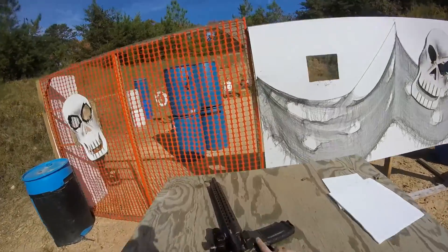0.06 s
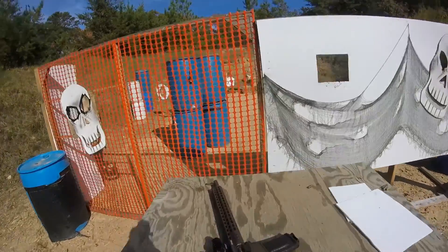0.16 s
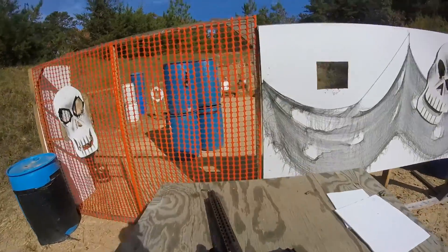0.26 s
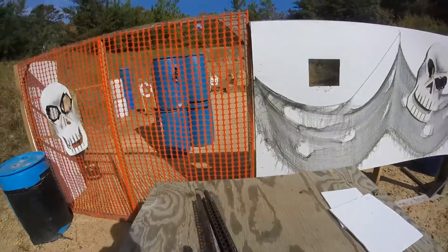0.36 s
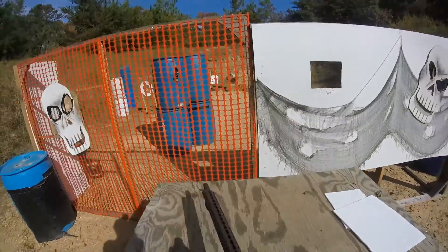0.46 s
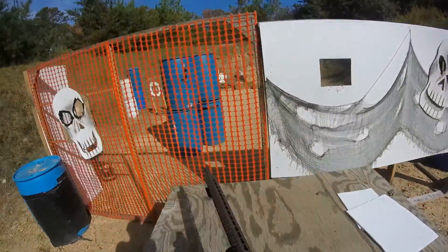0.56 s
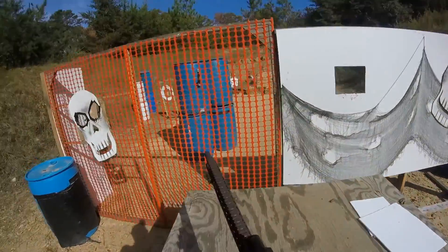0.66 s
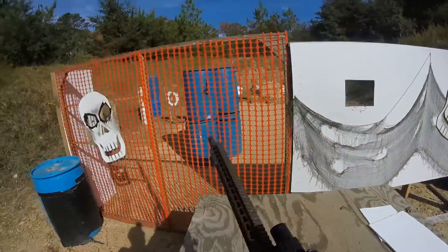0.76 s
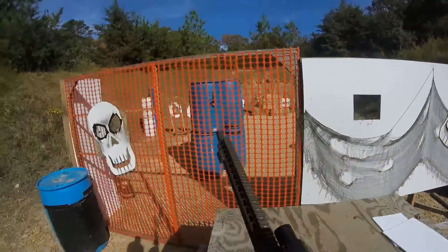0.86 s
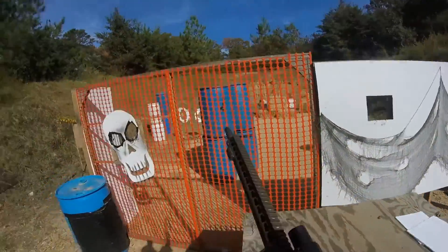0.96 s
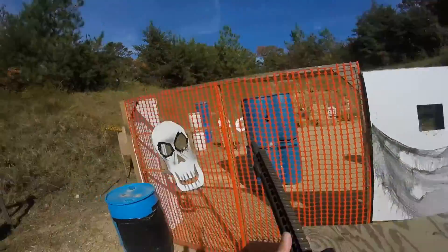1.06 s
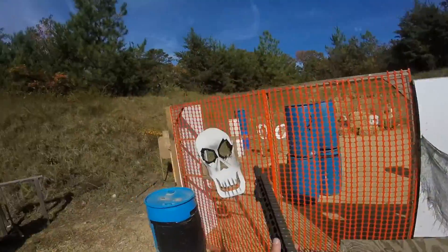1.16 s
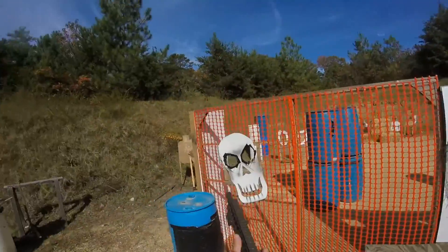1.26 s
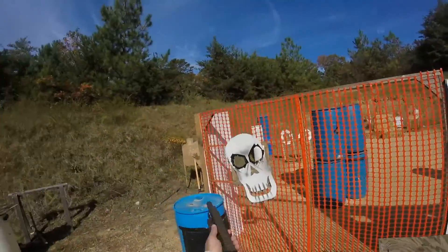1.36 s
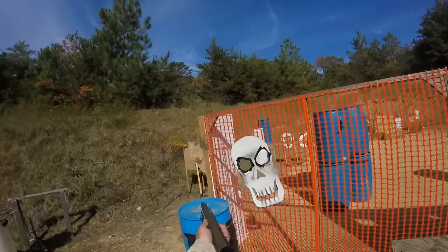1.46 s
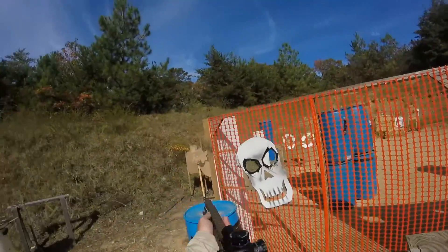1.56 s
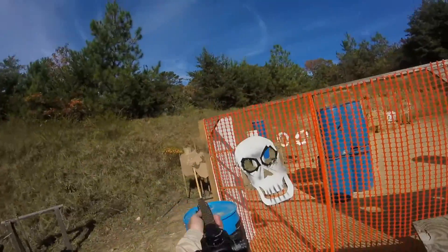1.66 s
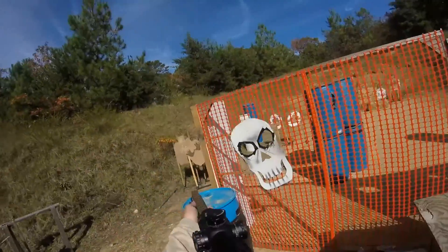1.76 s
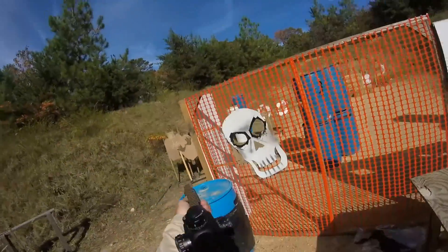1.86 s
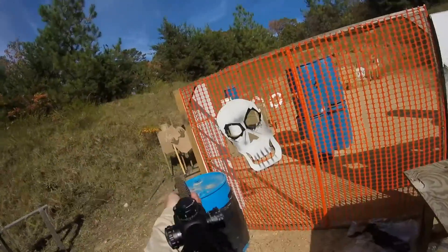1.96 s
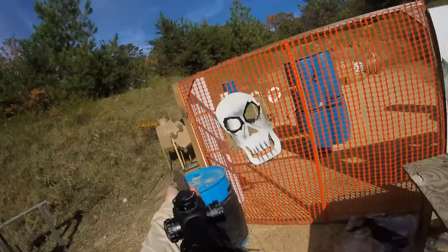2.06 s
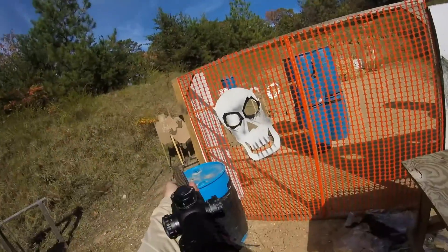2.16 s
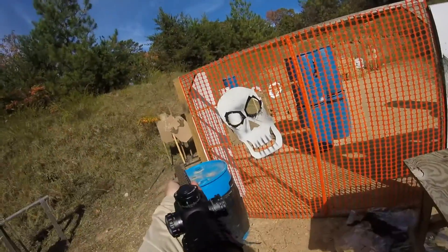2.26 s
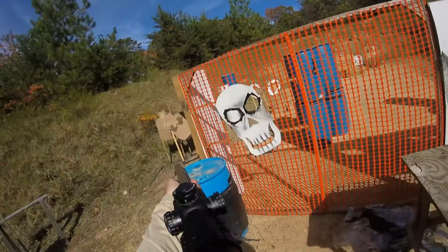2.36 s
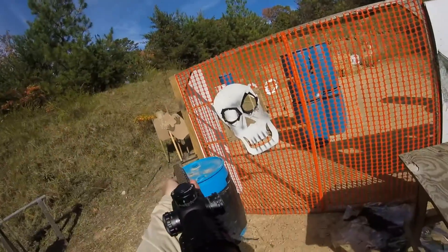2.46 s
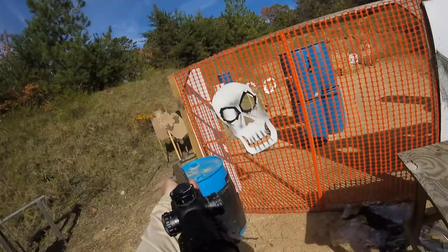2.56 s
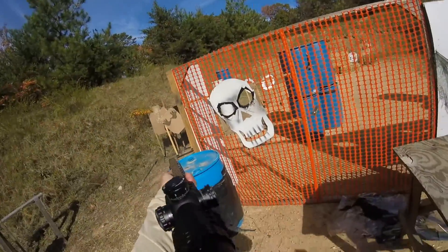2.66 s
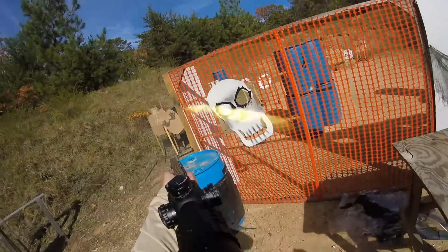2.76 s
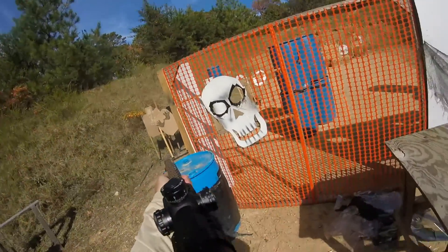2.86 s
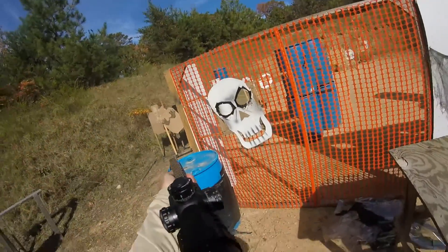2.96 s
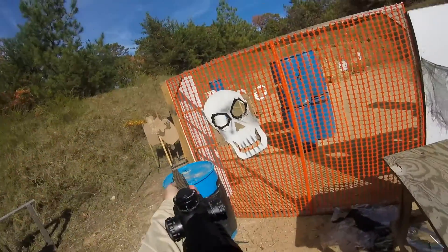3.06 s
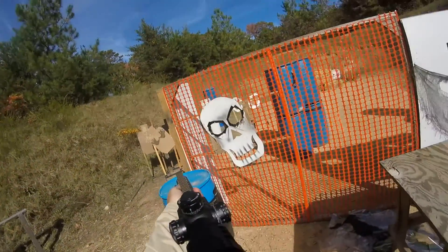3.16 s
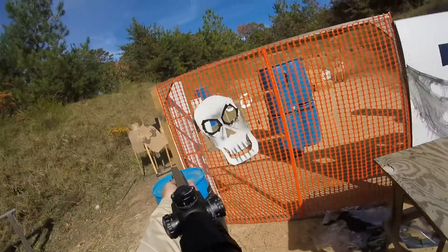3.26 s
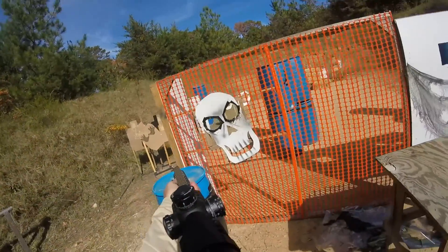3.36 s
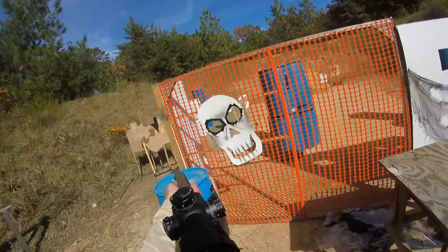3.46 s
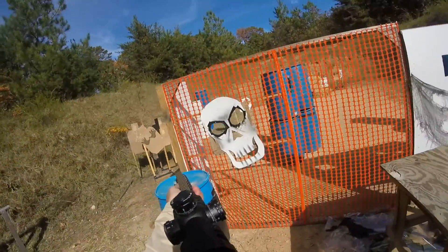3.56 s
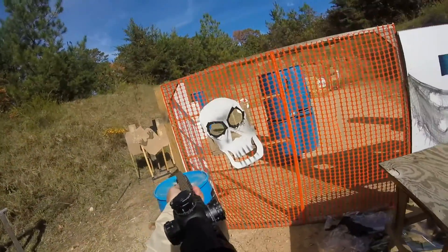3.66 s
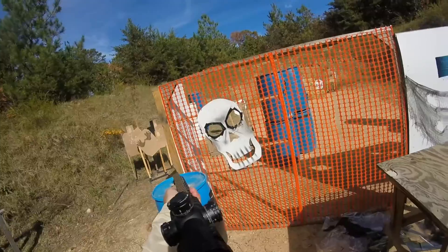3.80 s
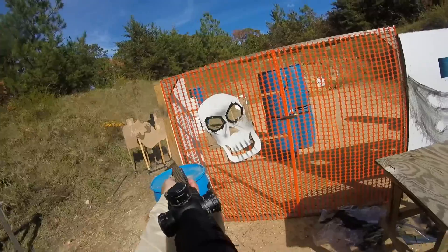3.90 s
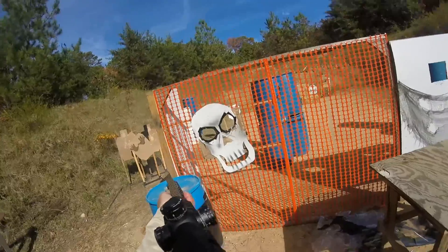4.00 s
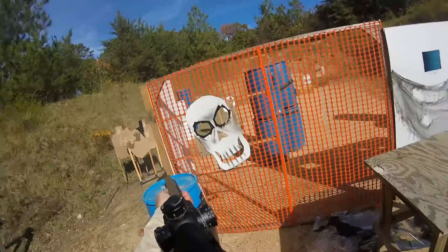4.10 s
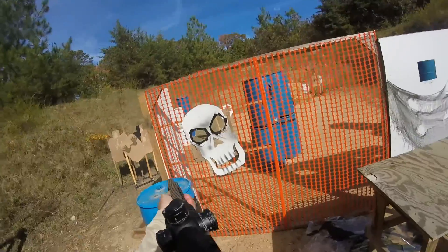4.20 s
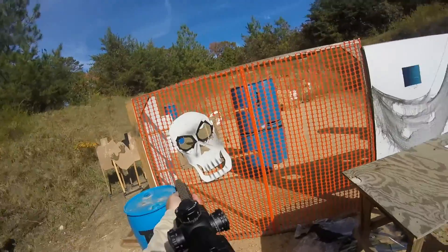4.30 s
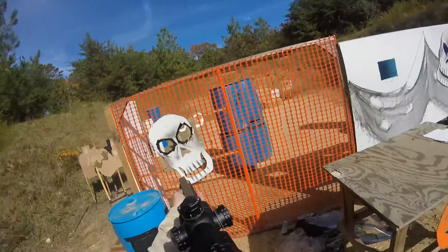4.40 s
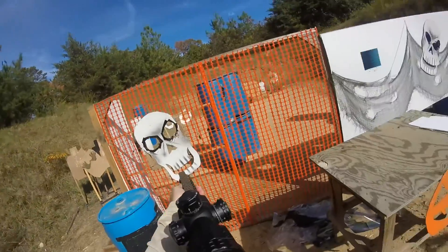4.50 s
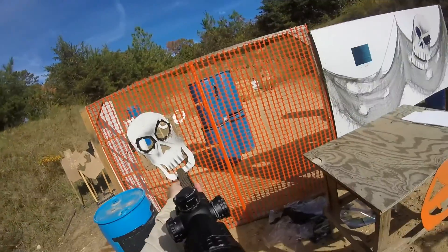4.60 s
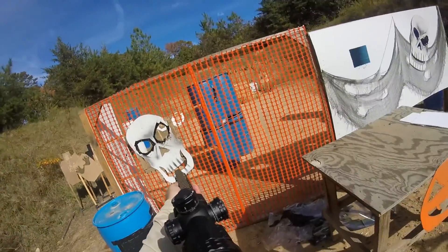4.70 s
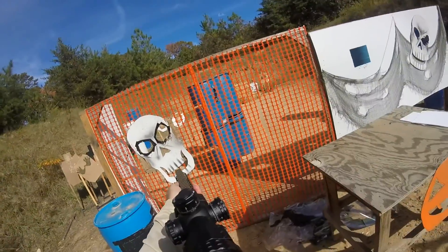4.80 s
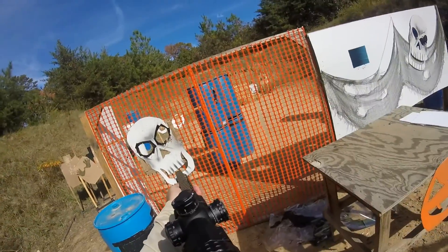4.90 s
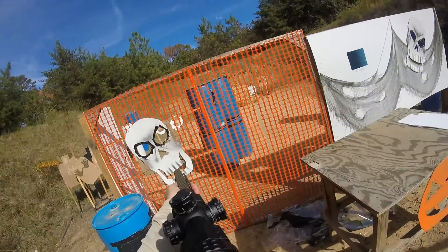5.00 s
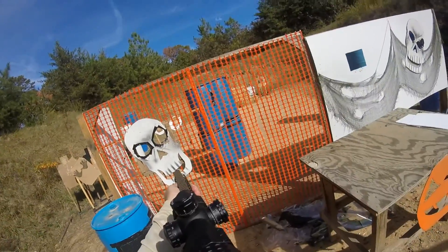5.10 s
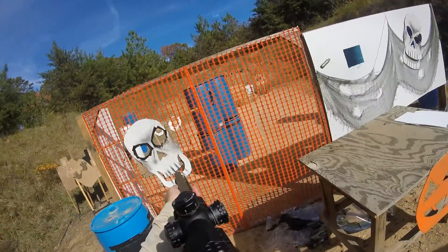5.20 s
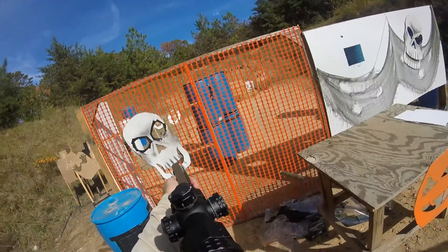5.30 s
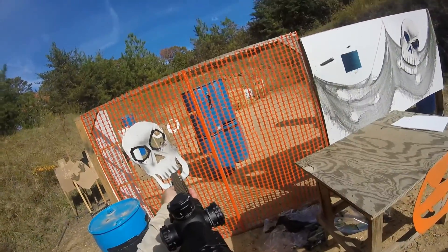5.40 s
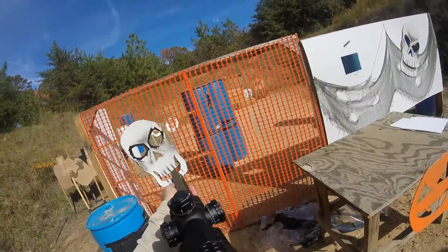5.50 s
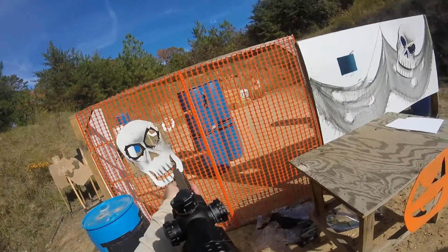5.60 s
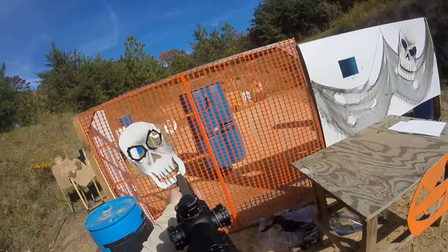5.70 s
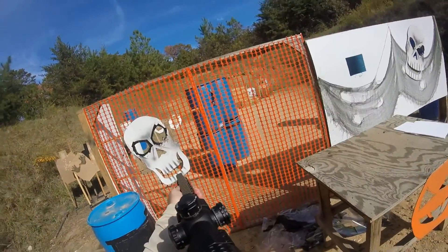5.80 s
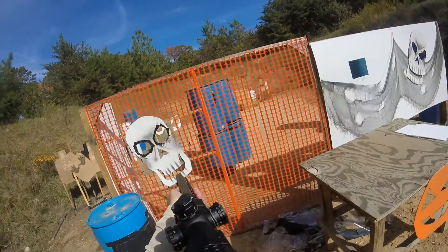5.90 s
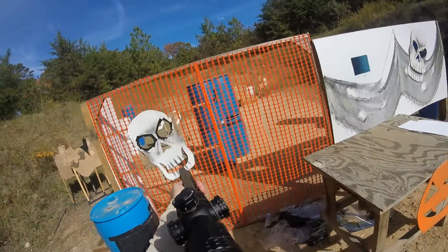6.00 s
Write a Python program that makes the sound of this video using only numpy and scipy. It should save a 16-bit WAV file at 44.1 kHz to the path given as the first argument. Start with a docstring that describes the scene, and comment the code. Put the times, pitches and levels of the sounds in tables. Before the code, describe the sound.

Light wind and gravel footfalls open, with small metallic ticks and one muffled gunshot farther off. After a few more steps, close semi-automatic rifle shots come in three quick pairs, about a second apart. Each is sharp and overloaded, ringing the plastic camera housing, followed by rough outdoor reflections that fade quickly. Faint rustle, a footfall, a case tick and dull knock sit between and after, pushed down by automatic gain.

```python
"""Footfalls on gravel in light wind, one shot from another bay, then three quick pairs of rifle shots.
Outdoor range, heard by a head-worn camera: each blast rings the plastic housing and overloads the microphone.
Blasts are shock pulses, bark and jet noise; props, berms and trees return delayed bursts and scatter.
Steps, clothes, gear and wind are shaped noise; the housing is a modal filter, then gain control and clipping.
"""
import sys
import numpy as np
from scipy import signal
from scipy.fft import rfft, irfft
from scipy.io import wavfile
from scipy.ndimage import uniform_filter1d

SR = 44100
rng = np.random.default_rng(int(sys.argv[2]) if len(sys.argv) > 2 else 0)


def inscribe(sig):
    """Save sig as 16-bit PCM at rate SR to the path in sys.argv[1].

    A 1-D sig is mono; a 2-D sig holds one channel per row.
    Samples are clipped to [-1, 1] before scaling.
    """
    pcm = np.round(np.clip(np.atleast_2d(sig).T, -1, 1) * 32767)
    wavfile.write(sys.argv[1], SR, pcm.astype(np.int16))


N = 266805

# All levels are relative, ahead of housing and gain control.
# Rifle shots: start_s, blast_db, low_push_db, range_echo_db, far_berm_echo_db
RIFLE_SHOTS = [(2.6539, 32.5, 8.5, -16, -44.5), (2.8277, 32, 3.5, -16.5, -14),
               (3.896, 33.5, 1, -16.5, -20.5), (4.0625, 33, 11.5, -20, -53), (5.1483, 31.5, -3, -17, -34),
               (5.3298, 33, 3.5, -20, -47)]
# Reflections from ground and props: delay_s, level_db, smear_s
NEAR_REFLECTIONS = [(.0068, -16.5, 0.0011), (.0096, -32.5, .009), (.017, -30, .004), (.029, -41, .012)]
# Modes of the camera housing: mode_hz, width_hz, level_db
HOUSING_MODES = [(734, 260, -13), (1083, 400, -18), (1445, 90, -3.5), (1556, 95, 0.5), (2145, 23, -14),
                 (2915, 90, -9.5), (3812, 130, -11.5), (5850, 330, -22.5), (6240, 110, -19.5),
                 (8800, 450, -27.5)]
# Transmission of the housing between its modes: freq_hz, level_db
HOUSING_WALL = [(30, -6), (250, -22.5), (500, -27), (1100, -11), (2000, -12), (2500, -12.5), (3400, -15),
                (4000, -19.5), (4500, -24.5), (8500, -24), (10000, -28.5), (14000, -33), (16000, -61.5)]
# Colour of scatter from berms and trees: freq_hz, level_db
SCATTER_COLOUR = [(40, -10.5), (250, 12), (700, -6), (1100, -6), (1500, 1), (3000, 5), (8000, 4),
                  (15000, -6)]
# Decay of that scatter: freq_hz, t60_s
SCATTER_T60 = [(100, 0.33), (700, 2.3), (1500, 1.65), (3000, 1.34), (6000, .95), (9000, 0.73),
               (14000, 0.38)]
# Shot from another bay: start_s, crack_db, echo_db
OTHER_BAY_SHOT = (1.3150, 9.5, 0.67)
# Colour of its crack: freq_hz, level_db
OTHER_BAY_CRACK = [(40, 3.5), (200, 5), (480, 9.5), (1000, -7.5), (1500, -2.5), (3000, -8.5), (8000, -8.5),
                   (15000, -19)]
# Colour of its echo: freq_hz, level_db
OTHER_BAY_ECHO = [(100, -8), (1000, -3.5), (1550, -2), (2300, -2), (3000, -0.5), (3800, -3), (8000, -3.5),
                  (15000, -1.5)]
# Footfalls, centred on centre_s: centre_s, length_s, level_db
FOOTFALLS = [(.235, .055, -49), (.36, .15, -55), (.592, .03, -45), (.878, .05, -53), (1.08, .05, -57),
             (1.76, .17, -50), (2.01, .07, -46), (2.22, .045, -48), (3.608, .06, -53), (6.0, .1, -56)]
# Ticks of gear and spent cases: start_s, level_db, decay_s
GEAR_TICKS = [(0.835, -13.5, 0.0045), (1.22, -14.5, 0.0066), (1.596, -1, 0.0027), (1.869, -15.5, 0.0033),
              (4.986, -5.5, 0.01)]
# Colour of the ticks: freq_hz, level_db
GEAR_TICK_COLOUR = [(200, -22), (1100, -30), (1400, -17), (1900, -13), (2600, -23), (4000, -14),
                    (8000, -12), (15000, -16)]
# Dull knocks: start_s, level_db
DULL_KNOCKS = [(2.982, -2), (5.878, -27)]
# Colour of the knocks: freq_hz, level_db
DULL_KNOCK_COLOUR = [(60, 2), (250, 5.5), (500, 13), (750, 2), (1000, -20), (1350, -1), (1600, -5),
                     (3000, -14), (10000, -30)]
# Colour of clothes and gravel: freq_hz, level_db
GRIT_COLOUR = [(100, -9.5), (900, -13.5), (1550, -11), (2000, 4), (4000, -3.5), (9000, -4.5), (15000, -6)]
# Air flowing past the camera as the shooter moves: time_s, level_db
AIRFLOW_LEVEL = [(0.0, -42), (1.99, -39.5), (2.29, -43), (2.71, -47), (3.18, -50), (3.94, -45.5),
                 (4.41, -53.5), (5.17, -43), (5.48, -53.5), (6.05, -45)]
# Colour of the wind on the microphone: freq_hz, level_db
WIND_COLOUR = [(8, -8), (18, 1.5), (40, -6.5), (55, -19), (75, -27), (150, -47), (400, -73), (2000, -110)]
# Stronger gusts: centre_s, width_s, level_db
GUSTS = [(2.15, .42, -48.5), (3.7, .35, -50.5), (4.8, .25, -54)]
# Colour of the smaller eddies in those gusts: freq_hz, level_db
EDDY_COLOUR = [(25, -15.5), (55, -1), (80, -5), (150, -23.5), (400, -62), (2000, -100)]
# Colour of the steady background air: freq_hz, level_db
AIR_COLOUR = [(30, 5), (130, 3), (280, 10.5), (450, 4.5), (1000, -8.5), (1550, -12.5), (3000, -11.5),
              (6000, -10), (10000, -8), (16000, -3.5)]

HAMMER_LEAD_S, HAMMER_DB = .007, -18
PRIMER_LEAD_S, PRIMER_DB = .0014, -4
JOLT_LEAD_S, JOLT_DB = .0009, 21.7
BOLT_DELAY_S, BOLT_LAG_S_PER_SHOT, BOLT_DB = .046, .0011, -10
SCATTER_DELAY_S = .01
TREES_S, TREES_SPREAD_S, BERM_S = .16, .074, .228  # echo peaks, after SCATTER_DELAY_S
SLAP_DELAY_S, SLAP_DB, SLAP_DECAY_S = .236, 2, .012  # steep berm face; dB above its echo
RUSTLE_DB, RUSTLE_SPREAD_DB = -2, 1.2
SHUFFLE_DB, SHUFFLE_SPREAD_DB, SHUFFLE_S = 0, 4.5, .12
THUD_DB, GRIT_DB = 19, 5.5  # within a footfall
WIND_DB, GUST_DEPTH_DB, GUST_S = 7, -2.5, .2  # level on top of the airflow
AIR_DB = -36
EDGE_HZ = 15500


def rifle():
    """Hammer, primer, action ring and blast, then reflections, bolt closing and range echo."""
    air, t = np.zeros(N), clock(65536)
    for k, (start_s, blast_db, _, echo_db, berm_db) in enumerate(RIFLE_SHOTS):
        hammer = clack(ring_hz=6100, decay_s=.00046, rattle_db=-2.5)
        add(air, start_s - HAMMER_LEAD_S, amp(HAMMER_DB) * hammer)
        add(air, start_s - PRIMER_LEAD_S, amp(PRIMER_DB) * burst(decay_s=.00086))

        # the action rings as the charge burns
        jolt = highpass(clack(ring_hz=7400, decay_s=.0015, rattle_db=2), cut_hz=2500)
        add(air, start_s - JOLT_LEAD_S, amp(JOLT_DB) * jolt)
        add(air, start_s, amp(blast_db) * muzzle_blast())

        for delay_s, level_db, smear_s in NEAR_REFLECTIONS:
            add(air, start_s + delay_s, amp(blast_db + level_db) * burst(smear_s))

        # the bolt closes a little later with each shot
        bolt = clack(ring_hz=3720, decay_s=.0032, rattle_db=4.5)
        add(air, start_s + BOLT_DELAY_S + k * BOLT_LAG_S_PER_SHOT, amp(BOLT_DB) * bolt)

        add(air, start_s + SLAP_DELAY_S, amp(berm_db + SLAP_DB) * burst(SLAP_DECAY_S))
        trees = amp(echo_db) * (.71 + .25 * swell(t, TREES_S, TREES_SPREAD_S))
        berm = amp(berm_db) * 1.1 * arrival(t, peak_s=BERM_S, rise_s=.03, decay_s=.33)
        echo = scatter(grain_db=3.5, clump_db=.5, hold_s=.13) * np.hypot(trees, berm)
        add(air, start_s + SCATTER_DELAY_S, echo)
    return air


def muzzle_blast(bounce_db=-6, jet_db=-13.5, bark_hz=700, bark_db=-7):
    """Shock front, bounce off the shooter, bark of expanding gas and jet hiss; timing varies by shot."""
    gap_s, stretch = rng.uniform(.00118, .00134), rng.uniform(.88, 1.14)
    blast = shock(.00019 * stretch)
    add(blast, gap_s, amp(bounce_db) * shock(.00028))
    t = clock(len(blast))
    bark = np.sin(2 * np.pi * bark_hz / stretch * t) * np.exp(-t / .0007)
    jet = signal.lfilter([1, -1], [1, -.85], burst(decay_s=.0027))  # lows removed
    return blast + amp(bark_db) * bark + amp(jet_db) * jet


def shock(length_s, size=4096):
    """Blast wave: a pressure jump that falls through zero into suction."""
    u = clock(size) / length_s
    return (1 - u) * np.exp(-u)


def clack(ring_hz, decay_s, rattle_db):
    """Steel parts meet: a short decaying ring plus noisy rattle."""
    t = clock(4096)
    ring = np.sin(2 * np.pi * ring_hz * t) * np.exp(-t / decay_s)
    return ring + amp(rattle_db) * burst(decay_s)


def scatter(grain_db, clump_db, hold_s, size=65536):
    """Dense, clumped echoes hold, then decay by frequency; above 700 Hz, higher bands fade sooner."""
    grain = grain_db * rng.standard_normal(size)
    clumps = clump_db * wander(.008, size)
    taps = evened(rng.standard_normal(size) * amp(grain + clumps))
    hz, t, bands = signal.stft(taps, SR, nperseg=256)
    late_s = np.hypot(t, hold_s) - hold_s  # soft start of the decay
    decay = np.exp(-np.log(1000) * late_s / read(SCATTER_T60, hz)[:, None])
    bands = bands * amp(read(SCATTER_COLOUR, hz)[:, None]) * decay
    return signal.istft(bands, SR, nperseg=256)[1][:size]


def low_push(cut_hz=140):
    """Slow part of each blast: a lowpassed pressure pulse directly on the microphone."""
    push = np.zeros(N)
    for start_s, _, push_db, _, _ in RIFLE_SHOTS:
        add(push, start_s - .001, -amp(push_db) * shock(.0022))
    return signal.lfilter(*signal.butter(2, cut_hz, fs=SR), push)


def far_shot():
    """Another bay, screened by a berm: dull crack with ground bounce, then bright tree echo."""
    start_s, crack_db, echo_db = OTHER_BAY_SHOT
    out, t = np.zeros(N), clock(65536)

    bounce = arrival(t, peak_s=.0055, rise_s=.001, decay_s=.004)
    crack = .5 * np.exp(-t / .002) + 1.05 * bounce + .16 * np.exp(-t / .025)
    add(out, start_s, amp(crack_db) * crack * noise(OTHER_BAY_CRACK, len(t)))

    tree_line = arrival(t, peak_s=.08, rise_s=.028, decay_s=.05)
    spread = .13 + .26 * np.exp(-t / .3) + .65 * tree_line
    echo = coloured(scatter(grain_db=2, clump_db=.86, hold_s=.14), OTHER_BAY_ECHO)
    add(out, start_s, amp(echo_db) * spread * echo)
    return out


def shooter(thud_hz=285):
    """Boots thud and grind on gravel, clothes rustle, gear ticks and knocks: shaped noise."""
    grains = evened(uniform_filter1d(rng.standard_normal(N), size=120))
    grit = evened(noise(GRIT_COLOUR, N) * amp(5.1 * grains))
    thud_colour = [(thud_hz / 4, -16), (thud_hz / 1.36, -10), (thud_hz, 0),
                   (thud_hz * 1.25, -15), (thud_hz * 10, -50)]
    thud = evened(noise(thud_colour, N))

    # shifts of weight stir boots and clothes together
    shift = wander(SHUFFLE_S, N)
    shuffle = evened(thud * amp(SHUFFLE_SPREAD_DB * shift))
    rustle = evened(grit * amp(RUSTLE_SPREAD_DB * shift))
    out = amp(airflow_db()) * (amp(RUSTLE_DB) * rustle + amp(SHUFFLE_DB) * shuffle)

    footfall = amp(THUD_DB) * thud + amp(GRIT_DB) * grit
    for centre_s, length_s, level_db in FOOTFALLS:
        out += amp(level_db) * swell(clock(N), centre_s, length_s / 3) * footfall
    t = clock(4096)
    for start_s, level_db, decay_s in GEAR_TICKS:
        tick = noise(GEAR_TICK_COLOUR, len(t)) * np.exp(-t / decay_s)
        add(out, start_s, amp(level_db) * tick)
    for start_s, level_db in DULL_KNOCKS:
        knock = noise(DULL_KNOCK_COLOUR, len(t)) * np.exp(-t / .007)
        add(out, start_s, amp(level_db) * knock)
    return out


def wind():
    """Slow lumps of air on the microphone, plus quicker flutter in a few gusts."""
    lumps = amp(GUST_DEPTH_DB * wander(GUST_S, N))
    flow = evened(noise(WIND_COLOUR, N) * lumps) * amp(WIND_DB + airflow_db())
    gusts = sum(amp(level_db) * swell(clock(N), centre_s, width_s)
                for centre_s, width_s, level_db in GUSTS)
    return flow + gusts * evened(noise(EDDY_COLOUR, N))


def airflow_db():
    """Level of the air flowing past the camera, interpolated over time."""
    return np.interp(clock(N), *np.transpose(AIRFLOW_LEVEL))


def background_air():
    """Steady coloured noise under everything."""
    return amp(AIR_DB) * noise(AIR_COLOUR, N)


def housing(x, size=8192):
    """Plastic shell: minimum-phase filter whose modes ring after every blow."""
    hz = np.fft.rfftfreq(size, 1 / SR)
    power = amp(read(HOUSING_WALL, hz)) ** 2
    for mode_hz, width_hz, level_db in HOUSING_MODES:
        power = power + amp(level_db) ** 2 / (1 + ((hz - mode_hz) / width_hz) ** 2) ** 2
    log_gain = np.log(np.r_[power, power[-2:0:-1]]) / 2
    # the Hilbert transform of log gain supplies the phase
    ring = np.fft.ifft(np.exp(np.conj(signal.hilbert(log_gain)))).real
    return signal.oaconvolve(x, ring[:size // 2])[:N]


def amp(db):
    """Decibels to gain."""
    return 10 ** (np.asarray(db) / 20)


def evened(x):
    """Scales to rms 1."""
    return x / np.sqrt(np.mean(x ** 2) + 1e-20)


def read(points, hz):
    """Interpolates a spectrum on a log-frequency axis."""
    f, value = np.transpose(points)
    return np.interp(np.log(hz + 1), np.log(f), value)


def add(mix, start_s, sound):
    """Mixes a sound in at start_s."""
    part = mix[max(round(start_s * SR), 0):][:len(sound)]
    part += sound[:len(part)]


def clock(size):
    """Seconds since the start of a sound."""
    return np.arange(size) / SR


def coloured(x, points):
    """Filters a sound by a spectrum."""
    gain = amp(read(points, np.fft.rfftfreq(len(x), 1 / SR)))
    return irfft(rfft(x) * gain, len(x))


def noise(points, size):
    """White noise filtered by a spectrum."""
    return coloured(rng.standard_normal(size), points)


def burst(decay_s, size=4096):
    """White noise that dies away exponentially."""
    return rng.standard_normal(size) * np.exp(-clock(size) / decay_s)


def wander(length_s, size):
    """Slow random curve of rms 1, in lumps about length_s long."""
    cycles = np.fft.rfftfreq(size, 1 / SR) * length_s
    return evened(irfft(rfft(rng.standard_normal(size)) * cycles * np.exp(-cycles ** 2), size))


def swell(t, centre_s, width_s):
    """Gaussian hump in time."""
    return np.exp(-((t - centre_s) / width_s) ** 2 / 2)


def arrival(t, peak_s, rise_s, decay_s):
    """Echo envelope: Gaussian rise to the peak, then exponential decay."""
    return np.where(t < peak_s, swell(t, peak_s, rise_s), np.exp(-abs(t - peak_s) / decay_s))


def highpass(x, cut_hz):
    """Small steel parts radiate mostly treble: second-order highpass."""
    return signal.lfilter(*signal.butter(2, cut_hz, "high", fs=SR), x)


def scene():
    """Airborne sound passes the housing; wind and low push act directly on the microphone."""
    airborne = rifle() + far_shot() + shooter() + background_air()
    return (housing(airborne) + low_push() + wind())[None]


def record(dry, threshold_db=-22, squeeze=.37, fall_db_per_s=15, attack_s=.012, knee=6):
    """Gain control ducks on loud sound and creeps back; then soft clipping and band limit."""
    r = np.exp(-1 / (attack_s * SR))
    power = signal.lfilter([1 - r], [1, -r], np.minimum(dry[0] ** 2, 1))
    level_db = 10 * np.log10(power + 1e-12)

    # peak hold with a linear fall in dB
    fall_db = clock(N) * fall_db_per_s
    held_db = np.maximum.accumulate(level_db + fall_db) - fall_db
    over_db = np.maximum(held_db - threshold_db, 0)
    ducked = dry * amp(-squeeze * over_db)

    clipped = .95 * ducked / (1 + abs(ducked) ** knee) ** (1 / knee)
    dulled = signal.lfilter(*signal.bessel(2, 11000, fs=SR), clipped)
    band_limit = signal.firwin(101, EDGE_HZ, window=("kaiser", 7), fs=SR)
    return signal.oaconvolve(dulled, band_limit[None], "same")


dry = scene()
out = record(dry)
inscribe(out)
```